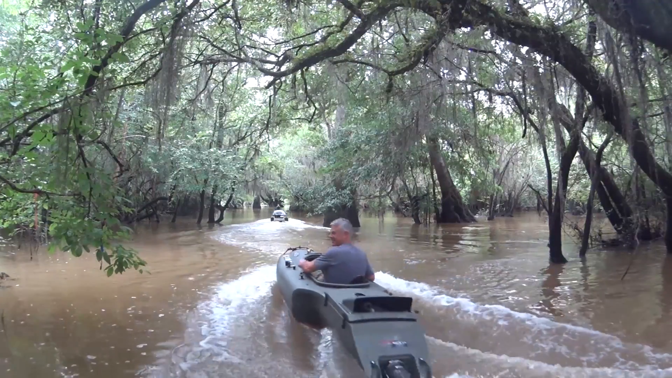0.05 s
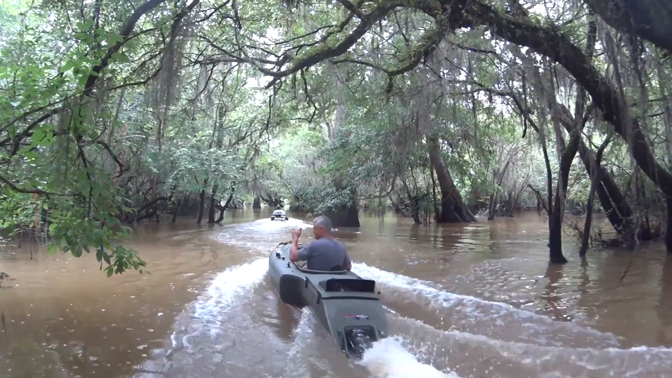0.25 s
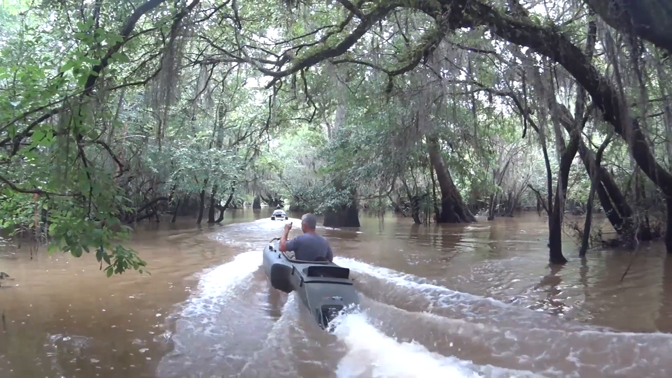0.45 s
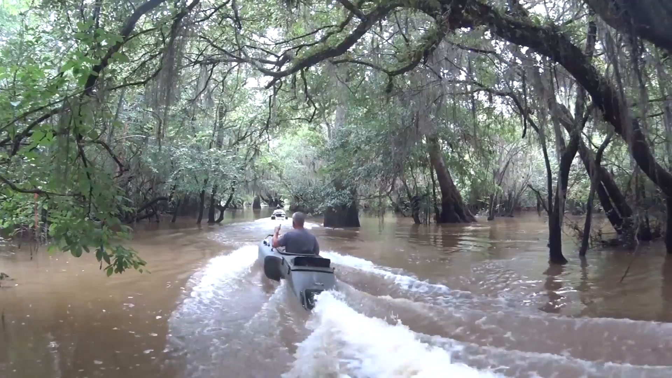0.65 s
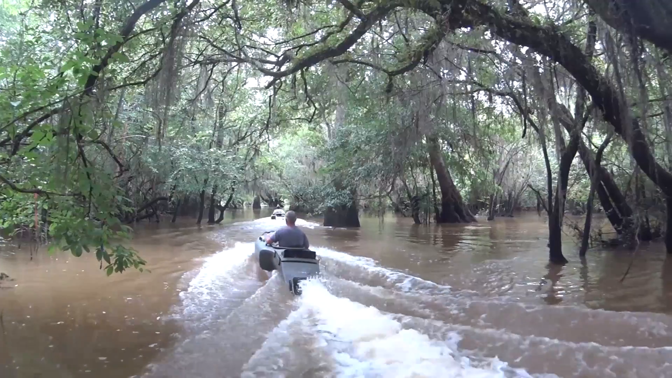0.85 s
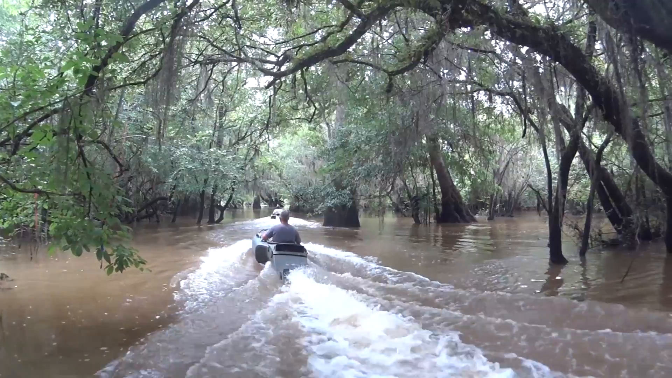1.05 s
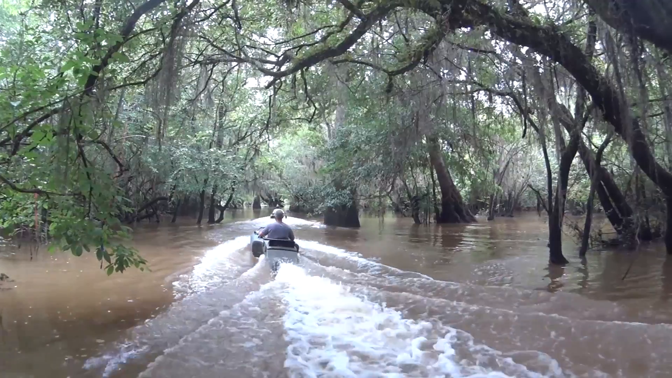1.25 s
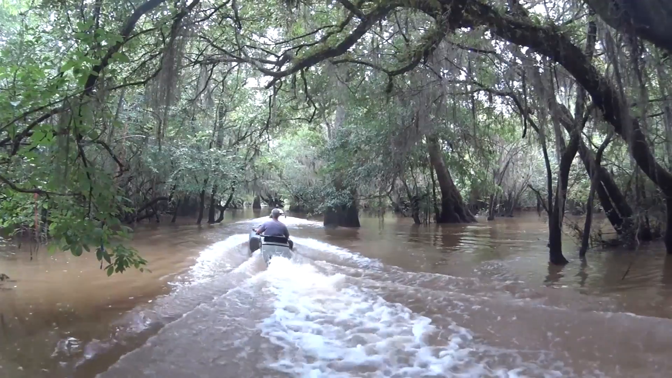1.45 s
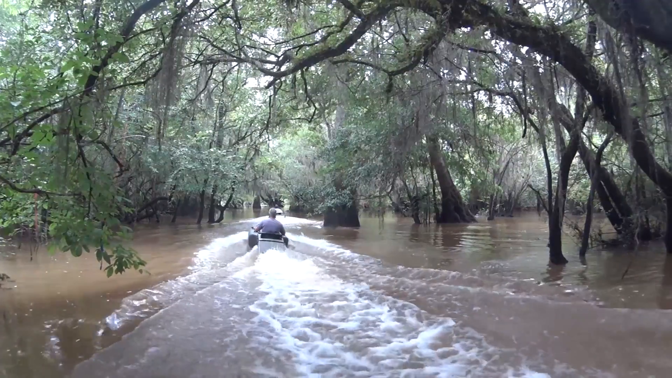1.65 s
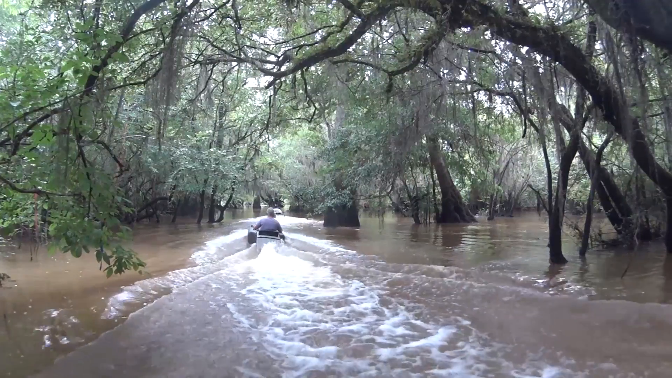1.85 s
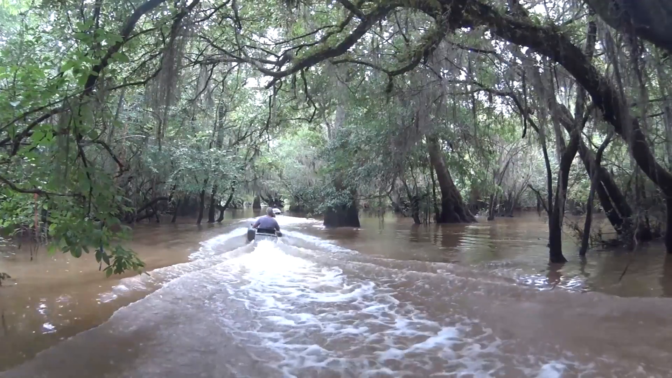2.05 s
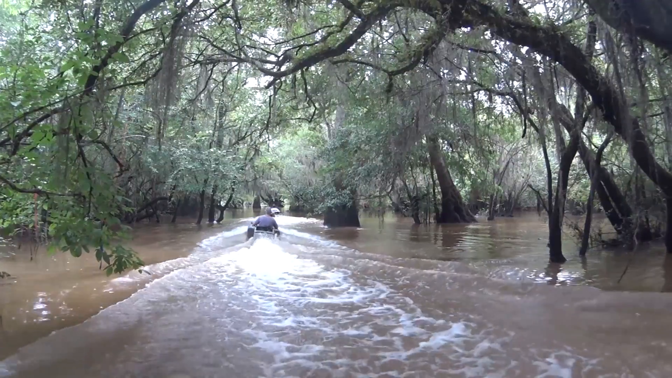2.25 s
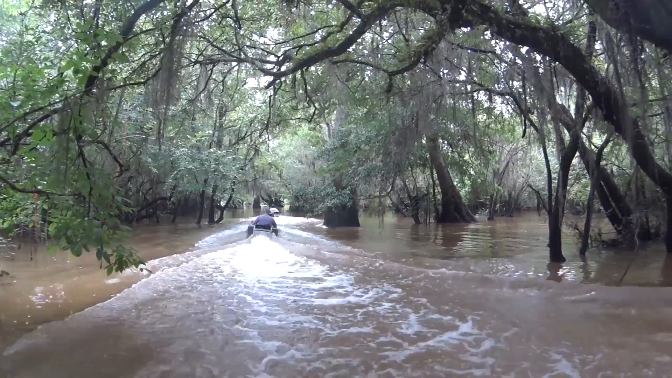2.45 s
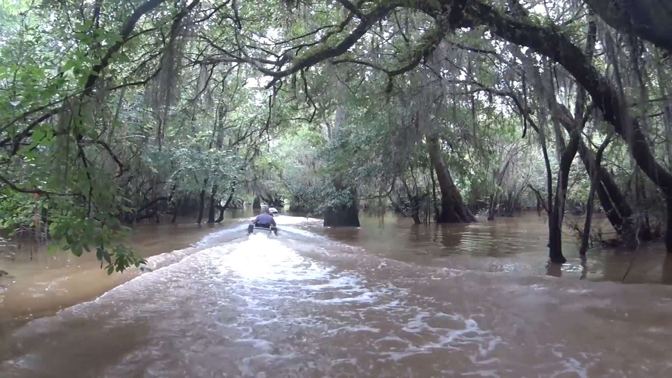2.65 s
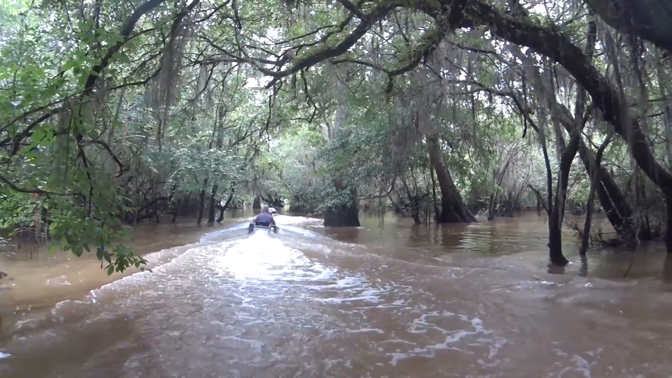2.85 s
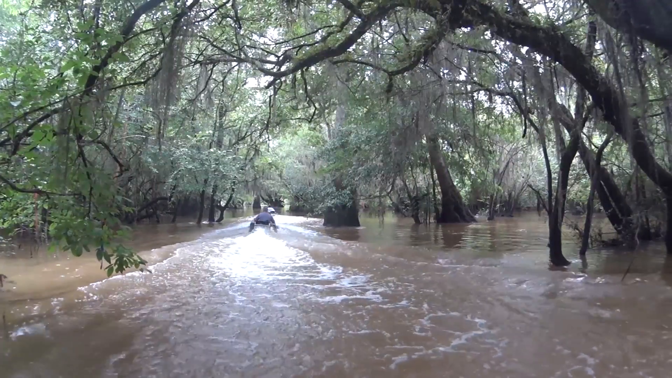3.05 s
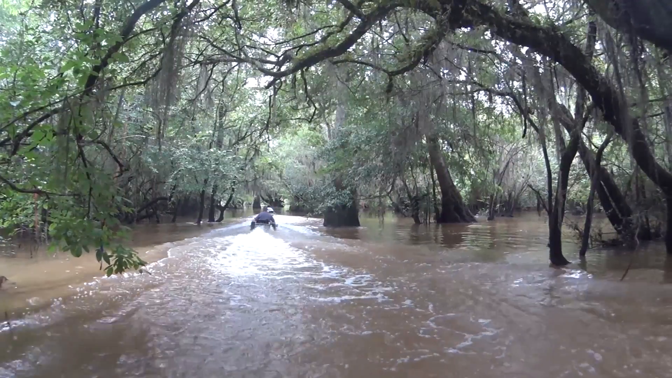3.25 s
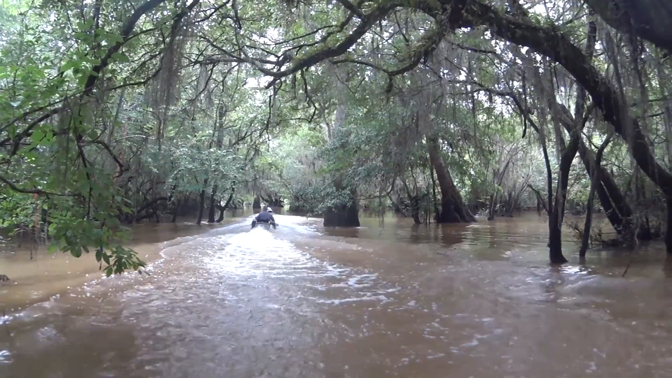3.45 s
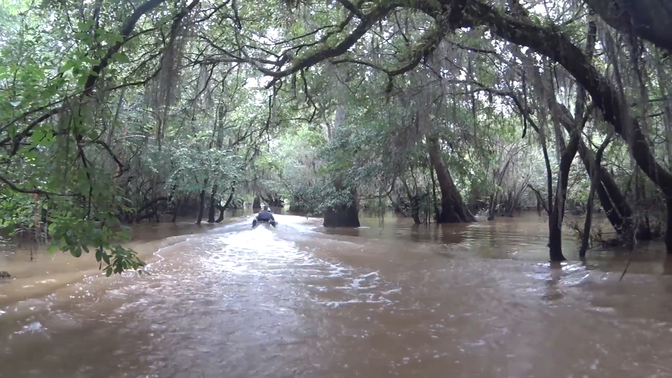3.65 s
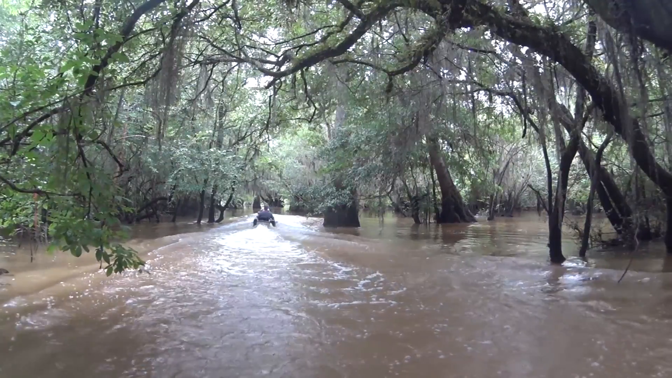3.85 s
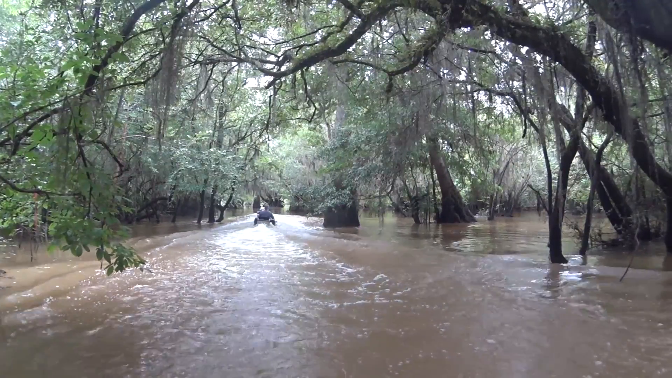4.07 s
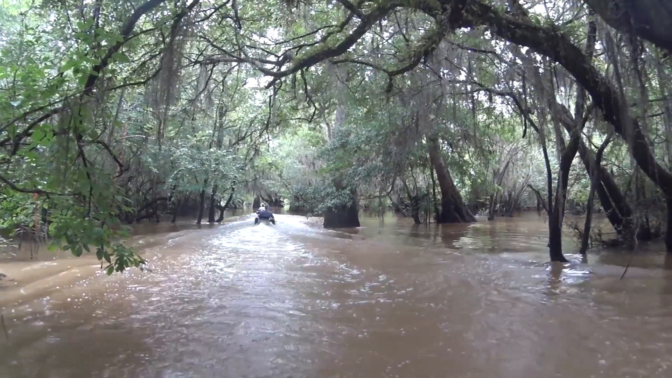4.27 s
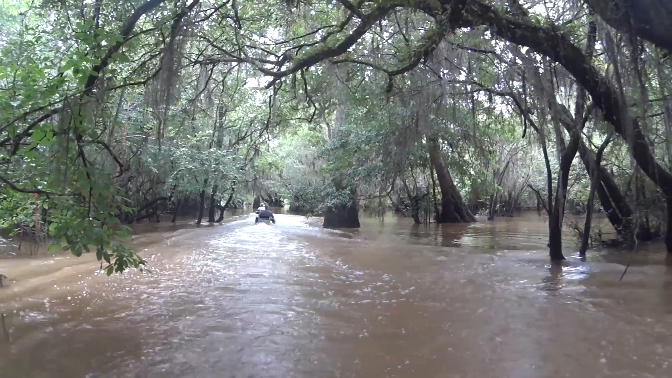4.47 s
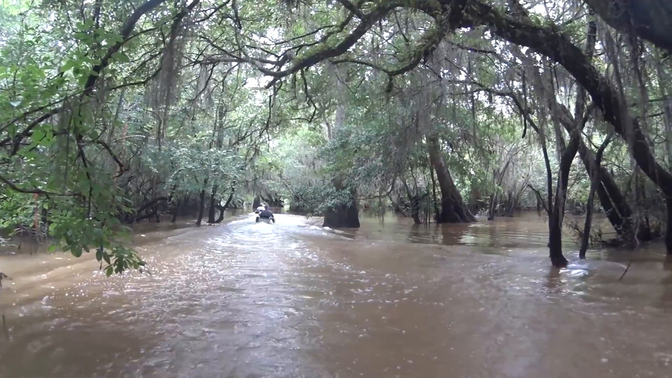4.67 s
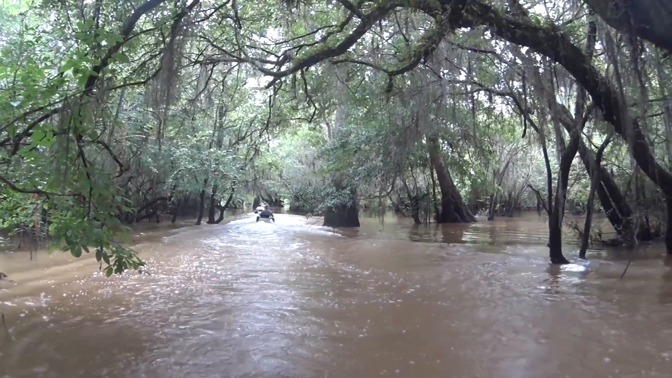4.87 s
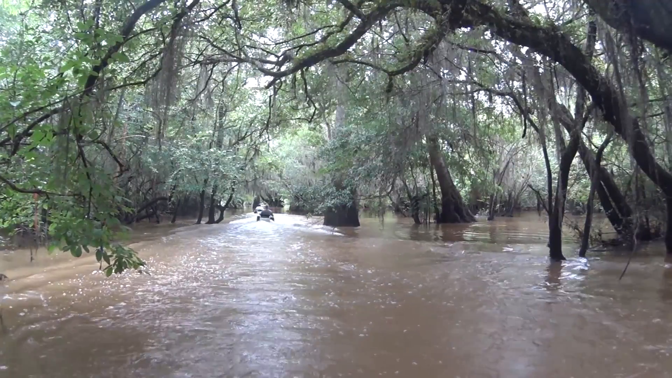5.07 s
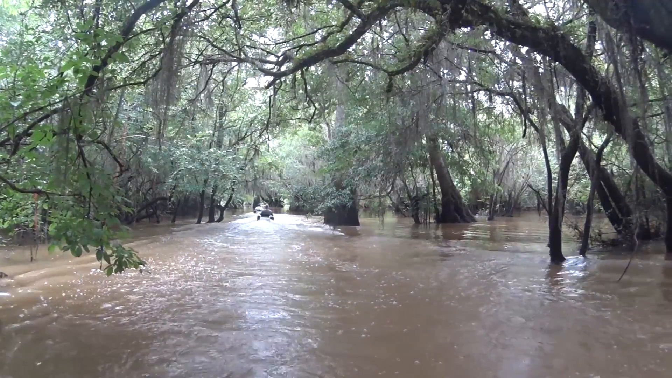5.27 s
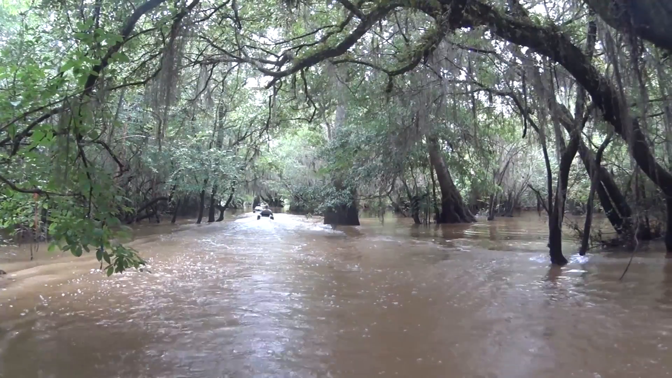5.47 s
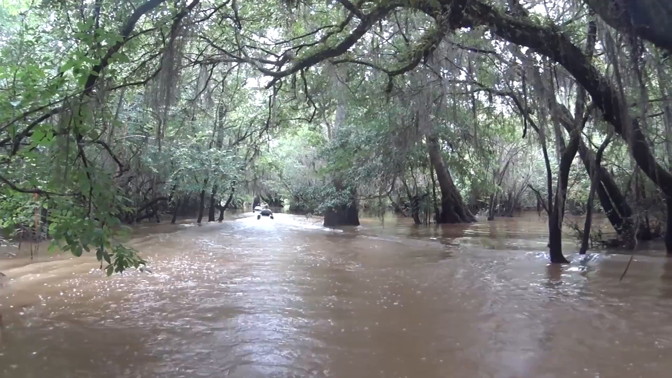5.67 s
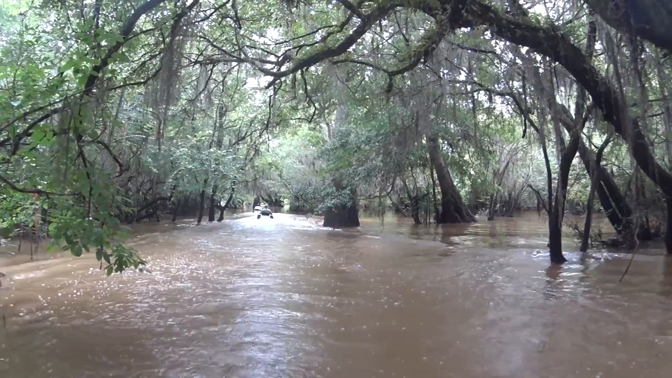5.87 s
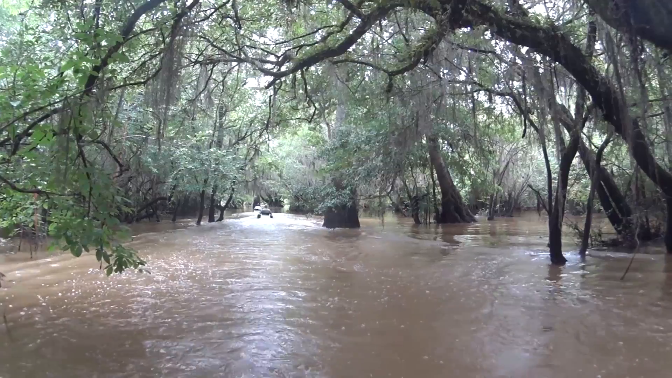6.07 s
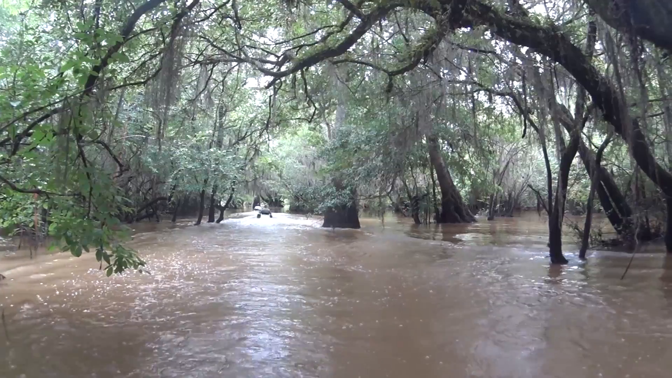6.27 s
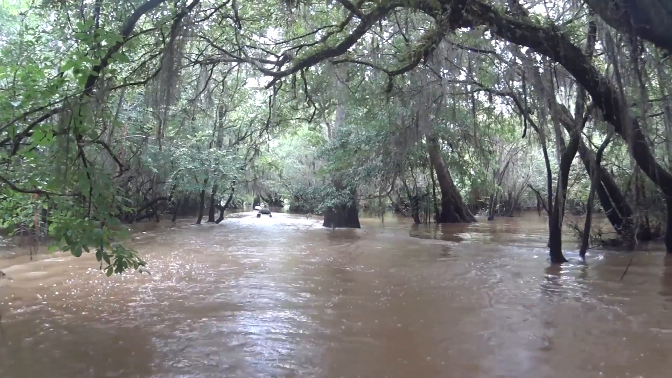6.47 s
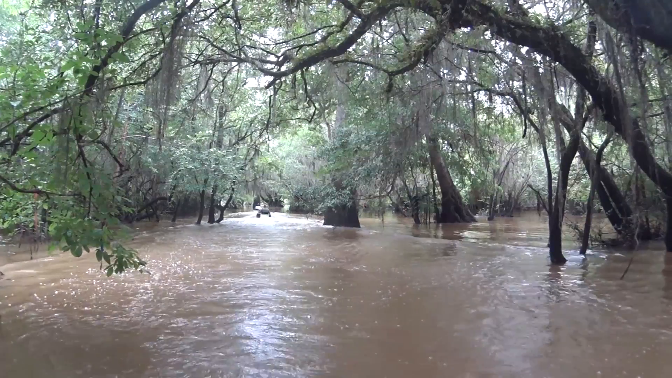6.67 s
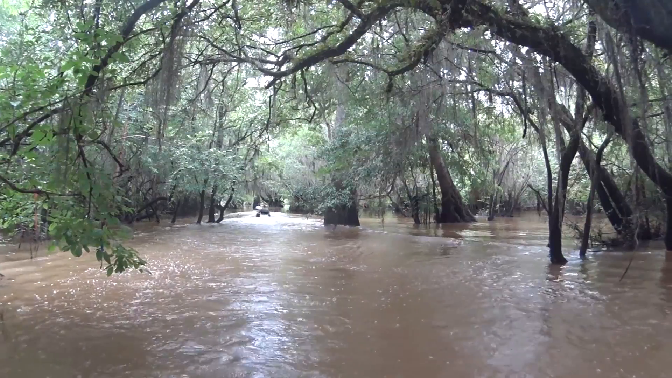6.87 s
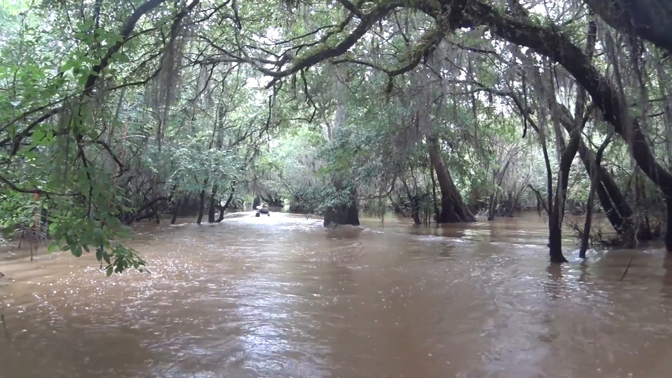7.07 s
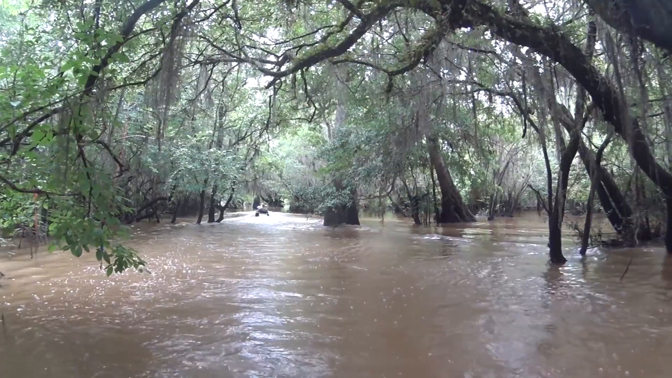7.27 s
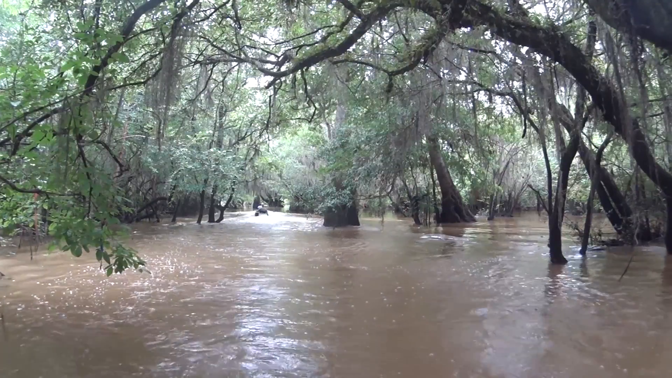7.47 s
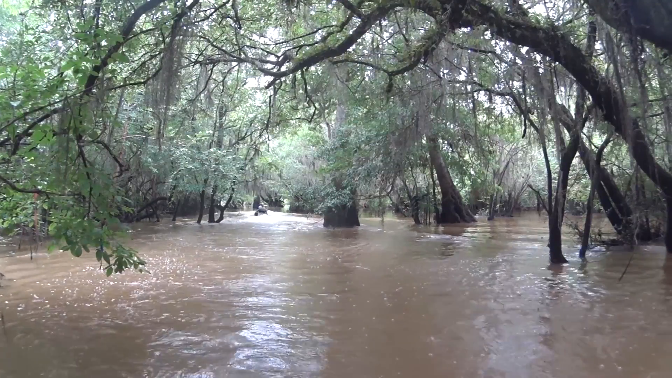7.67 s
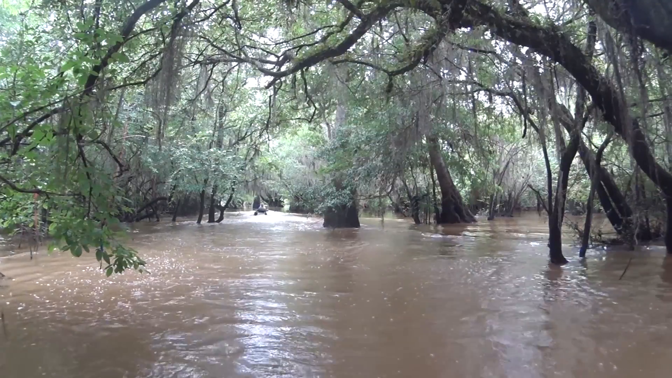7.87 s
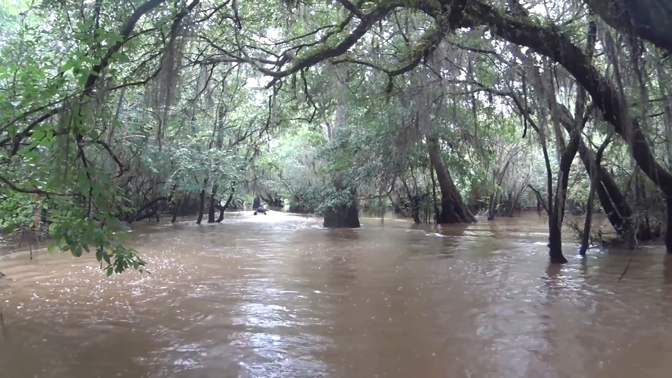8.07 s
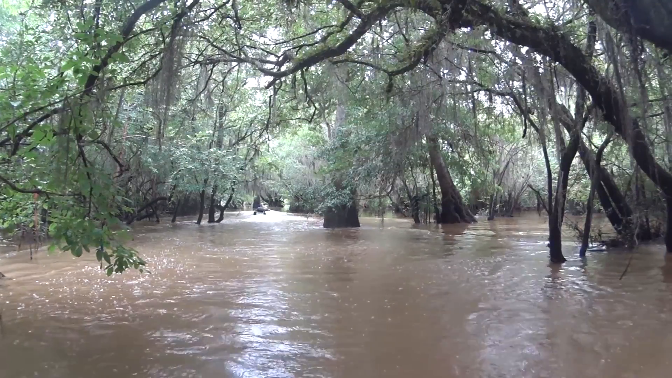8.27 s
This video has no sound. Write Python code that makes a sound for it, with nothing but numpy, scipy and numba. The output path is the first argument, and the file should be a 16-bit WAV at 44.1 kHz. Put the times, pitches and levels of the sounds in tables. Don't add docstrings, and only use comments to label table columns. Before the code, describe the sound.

At 0 s a small jet boat is right alongside: a loud, wide rush of spray, gurgling and fizzing with countless bubbles, over a fast, low single-cylinder putter, about 28 thumps a second, each with a gritty wet exhaust puff and tiny tick. A watery slap falls near 0.9 s as the boat pulls away; the hiss fades gradually, with a softer slap at 2.7 s. From 3.1 to 3.9 s the engine throttles back to about 22 beats a second, duller and quieter. Between 4 and 6.5 s its distant purr carries humming swells scattered by trees. A slap and plink come at 4.9 s, the clearest plop at 5.1 s, and smaller plops and slaps around 6.8 to 7.2 s. Gentle lapping flutters by the housed microphone. By 8.3 s only thin water hiss and a faint chug remain.

```python
import sys
import numpy as np
from scipy import signal
from scipy.fft import rfft, irfft
from scipy.io import wavfile
from scipy.ndimage import uniform_filter1d
from numba import njit

SR = 44100
rng = np.random.default_rng(int(sys.argv[2]) if len(sys.argv) > 2 else 0)


def store_wav(level_fs):
    pcm = np.round(np.clip(np.atleast_2d(level_fs), -1, 1) * 32767)
    wavfile.write(sys.argv[1], SR, pcm.T.astype(np.int16))


def level_to_linear(level):
    exponent = np.asarray(level, float) / 20
    return 10 ** exponent


N = 366912

# t/s, firing rate f/Hz
FIRING_RATE = [(0, 27.74), (.5, 27.78), (1.3, 28.1), (2.0, 27.56), (3.0, 27.57), (3.3, 26.49),
               (3.45, 24.61), (3.65, 23.09), (3.9, 22.22), (4.5, 21.95), (5.2, 21.85), (6.2, 22.05),
               (8.32, 21.4)]
# f/Hz, width/Hz, level/dB weighted by throttle
# (0 to 1), level/dB weighted by 1.5 - throttle, lag/cycles # gas in the muffler, lower when it cools
MUFFLER_MODES = [(232, 51, -11, -3.5, 0.298), (334, 21, -12.5, -8, 0.1506), (394, 29, -16.5, 0.5, 0.0613),
                 (422, 56.5, 5, -11.5, 0.0), (518, 45, -8, -19, 0.118), (605, 29, -13, -1.5, 0.2)]
HULL_MODES = [(141.4, 21, -12, -2, 0.7815), (170.3, 33, 2, -10, 0.057), (213, 23, 7, -29, 0.329)]
KEEL_MODES = [(56.3, 21, 1.5, -14, 0.16), (79.6, 10.6, -5.5, -0.5, 0.744), (106.6, 29, -6, 2, 0.608)]


def engine():
    rate_hz, = curves(FIRING_RATE)
    turns = np.cumsum(rate_hz) / SR + 1.55
    cycle = turns.astype(int)
    chance = rng.standard_normal((400, 8)).clip(-2, 2)
    throttle = np.clip((rate_hz - 22.5) / 4.703, 0, 1)
    muffler_db = part_db(throttle, alongside_db=-39.5, fading_share=1, stern_db=9.5, back_db=8.5)
    hull_db = part_db(throttle, alongside_db=-42.5, fading_share=0.9, stern_db=6, back_db=0.5)
    keel_db = part_db(throttle, alongside_db=-44, fading_share=0.92, stern_db=2, back_db=5.5)
    puff_db = part_db(throttle, alongside_db=-29.5, fading_share=1.95, stern_db=9.5, back_db=1)
    strength = level_to_linear(1.27 * chance[:, 0])
    thump = level_to_linear(muffler_db) * ring(MUFFLER_MODES, turns, throttle, strength)
    thump = thump + level_to_linear(hull_db) * ring(HULL_MODES, turns, throttle, strength)
    thump = thump + level_to_linear(keel_db) * ring(KEEL_MODES, turns, throttle, strength)
    age_s = (turns - cycle - 0.33) / rate_hz - 0.00096 * chance[cycle, 1]
    puff = level_to_linear(puff_db) * gas_puffs(age_s, cycle, chance)
    tick = level_to_linear(0.4 * muffler_db - 37.5) * valve_ticks(age_s)
    return thump + trunk_swells(turns) + puff + tick


def ring(modes, turns, throttle, strength):
    out = 0
    for hz, width_hz, full_db, back_db, lag in modes:
        cycle = (turns - lag).astype(int)
        strikes = np.diff(cycle, prepend=cycle[0]) * strength[cycle]
        once = svf(strikes, 1. * hz, 1.54 * width_hz)
        twice = svf(once, 1. * hz, 1.54 * width_hz)
        mode_db = throttle * full_db + (1.5 - throttle) * back_db + 0.36 * walk(2.493)
        out = out + level_to_linear(mode_db) * level(twice)
    return out


# f/Hz, level/dB from astern, extra level/dB from alongside
PUFF_BANDS = [(1400, -6.5, 8.5), (2180, 0, -2.5), (2760, 1.5, -19), (3980, 5, 4), (6200, -0.5, -4.5),
              (9100, 2, 2)]


def gas_puffs(age_s, cycle, chance):
    drift = uniform_filter1d(chance[::-1, 2:], size=9, axis=0)
    tint = level_to_linear(5.5 * chance[:, 2:] + 3.6 * drift)
    side_on_s = 0.78
    alongside = np.exp(-(np.arange(N) / SR / side_on_s) ** 2)
    gas = 0
    for k, (hz, astern_db, side_db) in enumerate(PUFF_BANDS):
        band = level(svf(rng.standard_normal(N), hz, 0.33 * hz))
        gas = gas + tint[cycle, k] * level_to_linear(astern_db + side_db * alongside) * band
    puff = swell(age_s, rise_s=0.0017, fall_s=0.0059) * gas
    energy = np.bincount(cycle, puff ** 2) + 1e-9
    wanted = level_to_linear(1.96 * chance[:, 0])[:len(energy)]
    puff = puff * (wanted / np.sqrt(energy))[cycle]
    return level(colour(puff, lambda f: level_to_linear(housing_db(f))))


def valve_ticks(age_s):
    burst = swell(age_s - 0.002, rise_s=0.00046, fall_s=0.0016) * rng.standard_normal(N)
    return level(svf(burst, 8175.0, 614.0))


# middle t/s, length/s, harmonic number, level/dB
TRUNK_SWELLS = [
    (3.5, 0.12, 4, -55),
    (4.074, 0.39, 6, -46),
    (4.55, 0.19, 4, -53),
    (5.353, 0.57, 6, -49.5),
    (5.8, .2, 7, -49),
    (6.106, 0.27, 6, -50.5),
    (6.5, 0.79, 11, -60),
    (7.35, .3, 4, -56),
]


def trunk_swells(turns):
    t = np.arange(N) / SR
    out = 0
    for middle_s, length_s, harmonic, db in TRUNK_SWELLS:
        rise_and_fall = np.exp(-(2 * (t - middle_s) / length_s) ** 2)
        tone = np.sin(2 * np.pi * round(harmonic) * turns)
        out = out + level_to_linear(db) * np.sqrt(2) * rise_and_fall * tone
    return out


def part_db(throttle, alongside_db, fading_share, stern_db, back_db):
    stern_turn_s = 1.38
    turned = 1 - np.exp(-np.arange(N) / SR / stern_turn_s)
    return alongside_db + fading_share * fading_db() + stern_db * turned - back_db * (1 - throttle)


WATER_ZONES_HZ = [600, 1250, 3500, 7500, 11000]


def water():
    spray_db, = curves(SPRAY_LEVEL)
    zones_db = np.array([zone_db(fading_share=0.26, bow_db=-9.5),
                         zone_db(fading_share=0.32, bow_db=9.5),
                         np.zeros(N),
                         zone_db(fading_share=0.35, bow_db=5.1),
                         zone_db(fading_share=0.022, bow_db=4)])
    zones_db = zones_db - zones_db[:, :SR].mean(axis=1, keepdims=True)
    foam_spectrum = rfft(foam())
    log_hz = np.log2(np.arange(N // 2 + 1) * SR / N + 1)
    surge, flicker, out = walk(2.89), walk(13), 0
    for hz in 30 * 2 ** np.arange(0, 9, .5):
        band = irfft(foam_spectrum * np.maximum(1 - 2 * abs(log_hz - np.log2(hz)), 0), N)
        share = [np.interp(np.log(hz), np.log(WATER_ZONES_HZ), row) for row in np.eye(len(WATER_ZONES_HZ))]
        flicker = 0.17 * flicker + 0.48 * walk(8)
        out = out + band * level_to_linear(share @ zones_db + .5 * surge + 1.14 * flicker + .5 * walk(18))
    depth = np.clip(-0.035 * fading_db(), 0, .9)
    out = out - depth * np.array([svf(port, 1890, 390) for port in out])
    return level_to_linear(spray_db + 1.16) * out


def foam():
    when, pitch, damping, luck = rng.random((12000, 4)).T
    size_db = np.minimum(-3.0 * np.log(luck + 1e-9), 11)
    start = (when * N).astype(int)
    pops = bubbles(start, 700 * 14 ** pitch, 1.8 + 4.1 * damping, level_to_linear(size_db), 0.039, N)
    bright_pops = colour(pops, lambda f: np.maximum(f / 1000, .3))
    direct = rng.standard_normal(N) + level_to_linear(-10.0) * level(bright_pops)
    scattered = colour(rng.standard_normal((2, N)), lambda f: level_to_linear(at_hz(TREE_COLOUR, f)))
    return level(colour(direct + scattered, lambda f: level_to_linear(housing_db(f))))


def zone_db(fading_share, bow_db):
    bow_wave_s = 0.72
    return -fading_share * fading_db() + bow_db * np.exp(-np.arange(N) / SR / bow_wave_s)


# t/s, level/dB
SPRAY_LEVEL = [
    (0, -22.5),
    (1.0, -23.5),
    (1.8, -25),
    (2.8, -28.5),
    (3.55, -32.5),
    (4.1, -34),
    (4.5, -34),
    (5.6, -37.5),
    (6.6, -39.5),
    (8.32, -40.5),
]


def fading_db():
    spray_db, = curves(SPRAY_LEVEL)
    return spray_db - spray_db[0]


# t/s, peak level/dB, f/Hz, length/ms
DROPS = [
    (4.9145, -31, 2430, 4.6),
    (5.131, -22, 1324, 4.7),
    (5.176, -33, 1275, 5.4),
    (6.8123, -32, 1134, 3.9),
    (7.0382, -34, 1204, 6.8),
]
# t/s, level/dB, length/ms
SLAPS = [
    (.88, -30.5, 50),
    (2.74, -35, 41),
    (4.91, -36, 14.3),
    (6.99, -37.5, 22),
    (7.18, -43, 23),
]


def splashes():
    start_s, peak_db, hz, ms = np.transpose(DROPS)
    out = bubbles((start_s * SR).astype(int), hz, hz * ms / 1000, 1.6 * level_to_linear(peak_db), 0.0084, N)

    def slap_colour(f):
        return level_to_linear(0.7 * housing_db(f)) * (f > 1500) / np.maximum(f, 1500)

    hiss = level(colour(rng.standard_normal(N), slap_colour))
    for slap_s, db, ms in SLAPS:
        age_s = np.arange(N) / SR - slap_s
        out = out + level_to_linear(db) * 2 * swell(age_s, rise_s=0.0055, fall_s=ms / 1000) * hiss
    return out


def lapping():
    lapping_db = -37.5 + 0.38 * fading_db() + 2 * walk(45)
    return level_to_linear(lapping_db) * level(svf(rng.standard_normal(N), 1234, 133))


# f/Hz, level/dB re direct
TREE_COLOUR = [(40, -5.5), (400, -1), (800, -4.5), (1250, -9.5), (2000, -1), (4500, -12.5), (7300, 1),
               (10500, -7.5)]


def tree_echo(direct):
    t60_s = 0.34
    age_s = np.arange(SR // 2) / SR
    envelope = swell(age_s - .004, rise_s=0.021, fall_s=t60_s / np.log(1000))
    tails = rng.standard_normal((2, SR // 2)) * envelope
    tails = tails / np.sqrt(np.sum(tails ** 2, axis=1, keepdims=True))
    scattered = signal.fftconvolve(direct[None], tails, axes=1)[:, :N]
    return colour(scattered, lambda f: level_to_linear(at_hz(TREE_COLOUR, f)))


# f/Hz, level/dB per Hz
HOUSING_COLOUR = [(25, -38), (42, -16.5), (150, -14.5), (450, -14.5), (800, -10), (1250, 3.5), (1500, -2.5),
                  (1750, -3), (2050, -7.5), (2650, 0.5), (3700, -4), (4500, 0), (7000, -12), (10800, -25.5)]
# f/Hz, width/Hz, level/dB
HOUSING_RIPPLE = [(694, 61, 0.5), (1000, 260, -3), (1770, 77, 4), (5450, 140, -2.5), (6000, 1200, 3.5),
                  (8320, 820, 6), (10290, 890, 11.5)]


def housing_db(hz):
    ripple = sum(db * np.exp(-((hz - f) / width) ** 2) for f, width, db in HOUSING_RIPPLE)
    return at_hz(HOUSING_COLOUR, hz) + ripple


# f/Hz, phase/rad
PORT_PHASE = [(0, 0), (260, -1.6), (520, -1.7), (1890, -0.8), (2580, -1.3), (3790, -0.7), (5430, -0.8),
              (5940, -0.5), (6980, -0.6), (9300, -0.2), (11500, -0.1)]
# f/Hz, level/dB
PORT_BALANCE = [(50, -2), (170, -2), (350, -5), (700, -7.5), (1250, -5), (1600, -2), (2300, 2.5),
                (3000, -0.6), (11000, 0)]


def ports(hz):
    f, lead = np.transpose(PORT_PHASE)
    left = level_to_linear(at_hz(PORT_BALANCE, hz) / 2) * np.exp(.5j * np.interp(hz, f, lead))
    pair = np.array([left, 1 / left])
    return pair / abs(pair.mean(axis=0))


@njit
def bubbles(start, hz, cycles, size, glide, length):
    out = np.zeros(length)
    for n in range(len(start)):
        tau = cycles[n] * SR / hz[n]
        phase = 0.
        for i in range(min(int(5 * tau), length - start[n])):
            phase += 2 * np.pi * hz[n] * (1 + glide * i / tau) / SR
            envelope = (1 - np.exp(-4 * i / tau)) * np.exp(-i / tau)
            out[start[n] + i] += size[n] * envelope * np.sin(phase)
    return out


@njit
def svf(x, hz, width):
    y, band, low = np.empty(len(x)), 0., 0.
    g, k = np.tan(np.pi * hz / SR), width / hz
    for i in range(len(x)):
        v = (band + g * (x[i] - low)) / (1 + g * (g + k))
        band, low, y[i] = 2 * v - band, low + 2 * g * v, k * v
    return y


def swell(age_s, rise_s, fall_s):
    age_s = np.maximum(age_s, 0)
    return (1 - np.exp(-age_s / rise_s)) * np.exp(-age_s / fall_s)


def walk(rate_hz):
    hold = int(SR / rate_hz)
    steps = np.repeat(rng.standard_normal(N // hold + 1), hold)
    return 1.53 * uniform_filter1d(uniform_filter1d(steps, hold), hold)[:N]


def level(x):
    return x / np.sqrt(np.mean(x ** 2))


def curves(table):
    s, *columns = np.transpose(table)
    return [np.interp(np.arange(N) / SR, s, c) for c in columns]


def at_hz(table, hz):
    f, value = np.transpose(table)
    return np.interp(np.log(np.maximum(hz, 1)), np.log(f), value)


def colour(x, gain):
    size = x.shape[-1]
    return irfft(rfft(x) * gain(np.arange(size // 2 + 1) * SR / size), size)


def scene():
    direct = engine() + splashes() + lapping()
    return water() + direct + level_to_linear(-6) * tree_echo(direct)


def top_cut(x):
    return signal.sosfilt(signal.butter(12, 12010, fs=SR, output="sos"), x)


def record(dry):
    mix = colour(dry, lambda f: ports(f) * (f < 11150))
    return top_cut(mix)


dry = scene()
out = record(dry)
store_wav(out)
```